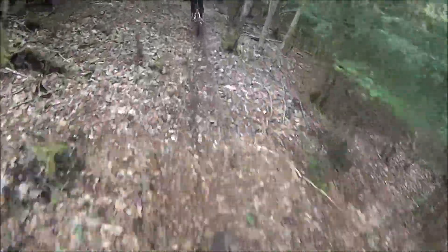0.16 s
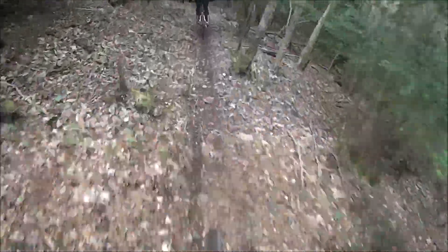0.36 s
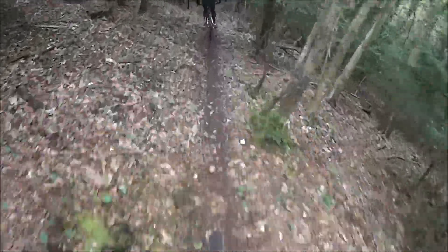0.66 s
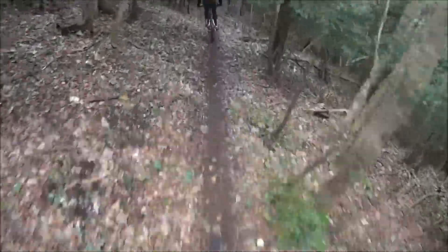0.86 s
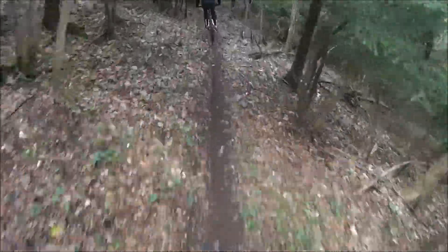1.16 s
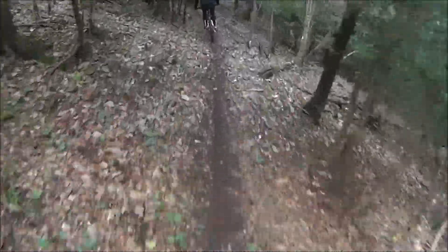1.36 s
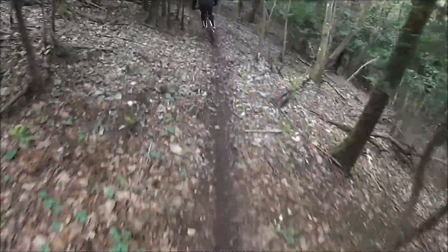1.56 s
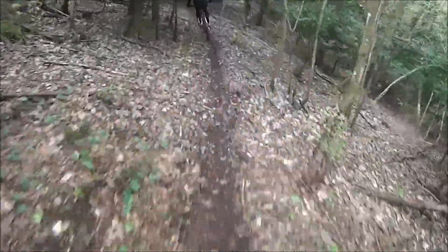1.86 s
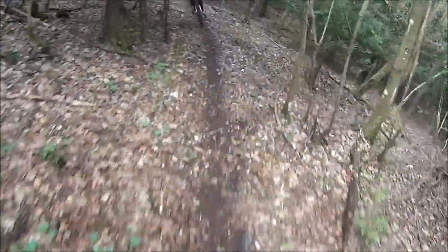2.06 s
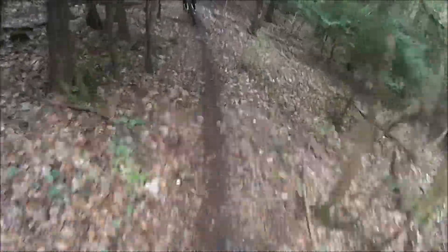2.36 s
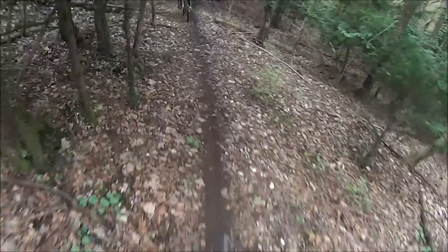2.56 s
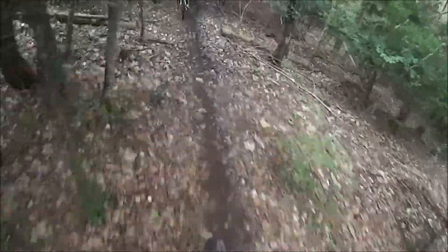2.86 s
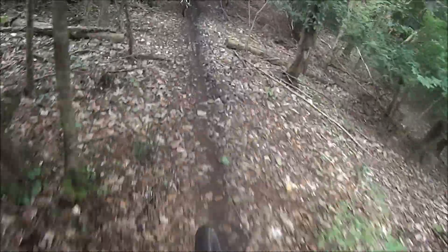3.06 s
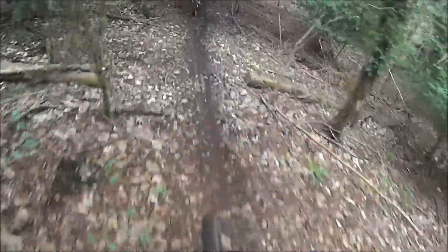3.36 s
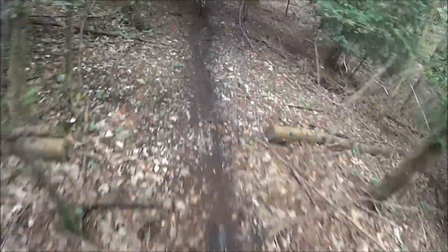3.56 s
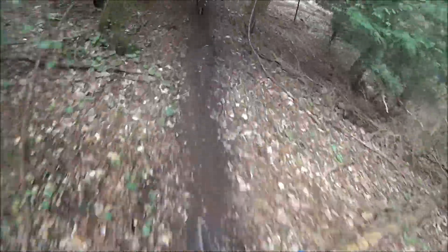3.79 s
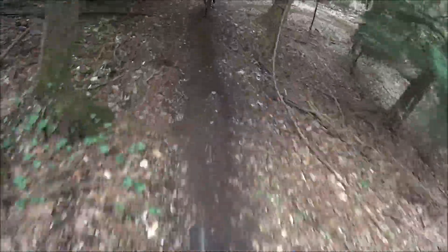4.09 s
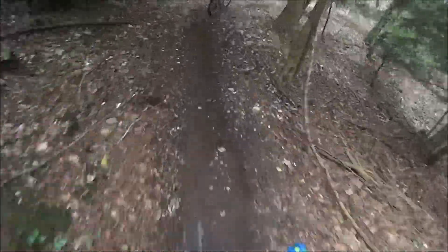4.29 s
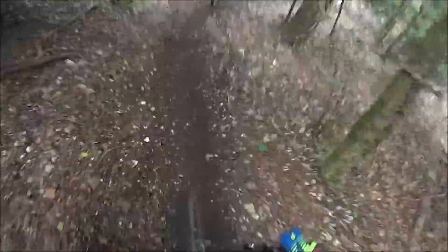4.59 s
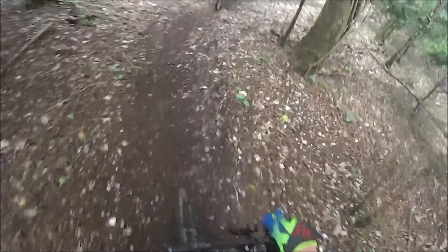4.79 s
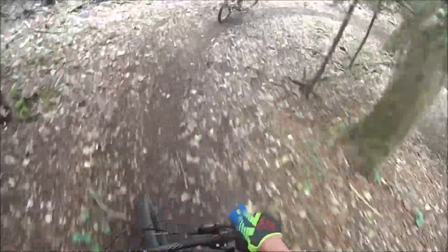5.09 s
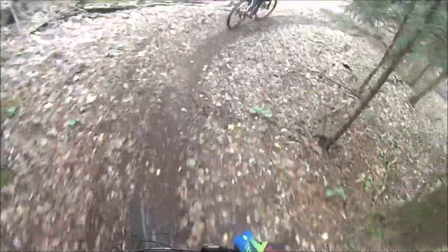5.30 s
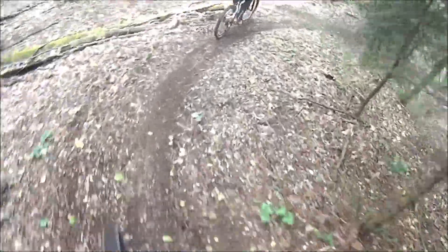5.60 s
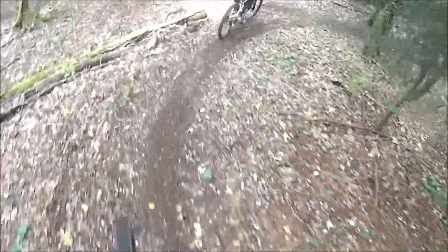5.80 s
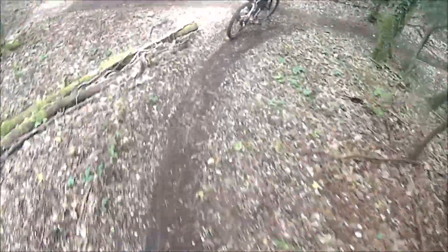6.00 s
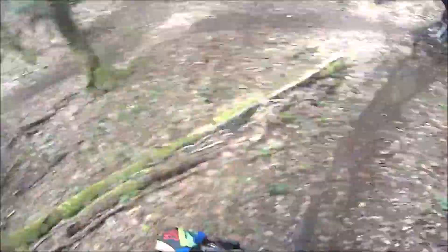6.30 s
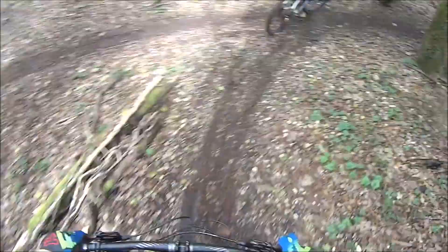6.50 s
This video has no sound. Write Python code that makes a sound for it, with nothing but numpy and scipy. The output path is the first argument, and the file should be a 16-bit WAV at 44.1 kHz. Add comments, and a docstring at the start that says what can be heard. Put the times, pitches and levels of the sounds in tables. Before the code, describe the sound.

Close, rough onboard stereo sound of a bike descending through woodland. Tyres fizz and crunch over dry litter while roots and stones knock the frame with dull thuds and bright clacks toward the left. Brief washboard runs patter evenly, a couple of deep jolts land early on, then a bend scrapes loudly through dirt with heavy blows and buffeting wind. Afterwards it settles to crackling leaves, snapping twigs, rattles and faint fluttering brake hiss.

```python
"""A mountain bike runs fast down a forest trail, heard in stereo from a camera microphone worn by the rider.
It opens in dry leaves: noise-burst crackle and crunch, twig cracks, decaying-mode thuds and swept clacks of a loose part.
Runs of evenly spaced bumps follow; around the fifth second comes a bend, with dirt rasp, heavy jolts and a swell of wind.
Then the rasp falls away and the leaves go on crackling.
Brake hiss and wind rumble, both filtered noise, run underneath throughout."""
import sys
import numpy as np
from scipy import signal
from scipy.fft import rfft, irfft, next_fast_len
from scipy.io import wavfile
from scipy.ndimage import map_coordinates

SR = 44100
rng = np.random.default_rng(int(sys.argv[2]) if len(sys.argv) > 2 else 0)


def to_wav(sig):
    """Store sig (one row per channel, or 1-D mono) as 16-bit WAV at the path in sys.argv[1].

    Samples outside -1..1 are clipped; the rate is SR.
    """
    pcm = np.clip(np.atleast_2d(sig), -1, 1) * 32767
    pcm = np.round(pcm).astype(np.int16)
    wavfile.write(sys.argv[1], SR, pcm.T)  # frames by channels


N = 293176
TIME = np.arange(N) / SR
TOP_HZ = 11100  # upper band limit of the camera


def amp(db):
    """Decibels to gain."""
    return 10 ** (np.asarray(db) / 20)


def unit(x):
    """Scale to rms 1."""
    return x / np.sqrt(np.mean(x ** 2) + 1e-20)


def along(points, hz):
    """(f/Hz, value) points read on a log frequency axis."""
    f, v = np.transpose(points)
    return np.interp(np.log(hz + 1), np.log(f + 1), v)


def curves(rows):
    """One value per sample for each column after the time."""
    s, *cols = np.transpose(rows)
    return [np.interp(TIME, s, c) for c in cols]


def wobble(rate):
    """A smooth random curve, rate knots a second."""
    grid = TIME[::40]
    knots = rng.standard_normal(int(N * rate / SR) + 4)
    return np.interp(TIME, grid, map_coordinates(knots, [grid * rate]))


def impulse(spectrum, size=2048):
    """The causal, minimum-phase ring of a body with this spectrum, energy 1."""
    cepstrum = irfft(np.log(amp(along(spectrum, np.fft.rfftfreq(size, 1 / SR)))))
    # fold the cepstrum forward in time
    cepstrum[1:size // 2] *= 2
    cepstrum[size // 2 + 1:] = 0
    ring = irfft(np.exp(rfft(cepstrum)))
    return ring / np.linalg.norm(ring)


# likeness of left and right at the microphone: (f/Hz, correlation from -1 to 1)
STEREO_LIKENESS = [(40, 1), (180, 0.78), (350, -0.31), (650, -0.59), (1100, -0.25), (2000, 0.73),
                   (6000, 0.89), (11000, 0.71)]


def spread(pair, spectrum):
    """Two unrelated signals become one coloured stereo sound of rms 1."""
    length = pair.shape[1]
    m = next_fast_len(length + 2048)
    likeness = along(STEREO_LIKENESS, np.fft.rfftfreq(m, 1 / SR))
    turn = np.arccos(np.clip(likeness, -1, 1)) / 2
    coloured = rfft(pair, m) * rfft(impulse(spectrum), m)
    mid, side = irfft(coloured * [np.cos(turn), np.sin(turn)], m)[:, :length]
    return unit(np.array([mid + side, mid - side]))


def add(track, s, sound):
    """Mix a short stereo sound in at time s."""
    start = max(round(s * SR), 0)
    track[:, start:start + sound.shape[1]] += sound[:, :max(N - start, 0)]


def filtered(x, response):
    """x times a complex response of frequency."""
    m = next_fast_len(N + SR // 2)
    return irfft(rfft(x, m) * response(np.fft.rfftfreq(m, 1 / SR)), m)[:, :N]


def chance_events(rate, level_db):
    """Random moments, the level at each, and two bell-shaped draws for each."""
    rows = rng.random((max(int(rate * N / SR), 1), 3))
    where = (rows[:, 0] * N).astype(int)
    draws = np.clip(np.log(rows[:, 1:] / (1 - rows[:, 1:])) / 2, -2, 2)
    return TIME[where], level_db[where], *draws.T


def crackle(rate, size_db, life, bed_db):
    """Tiny fractures of very unequal size, each a burst of noise decaying over life s, on a steady noise bed."""
    breaks = (rng.random(N) < rate / SR) * amp(size_db * np.minimum(rng.exponential(size=N), 4))
    power = signal.lfilter([1], [1, -np.exp(-2 / (life * SR))], breaks ** 2)
    return np.sqrt(power / power.mean() + amp(bed_db) ** 2) * rng.standard_normal((2, N))


# air on the microphone, stronger on rough ground: (t/s, level before gain/dB)
WIND_LEVEL = [(0.0, -58), (0.26, -57.5), (0.72, -53.5), (1.74, -45.5), (1.93, -54), (2.48, -52),
              (2.85, -53), (3.16, -62.5), (3.74, -57.5), (4.35, -50), (4.66, -39.5), (4.91, -49.5),
              (5.13, -57), (5.33, -61), (5.54, -63), (6.04, -50), (6.42, -57), (6.65, -55)]
# colour of the buffeting: (f/Hz, relative level/dB per Hz)
BUFFET_SPECTRUM = [(15, -7), (28, 7), (45, -6), (65, -1.5), (90, -11), (150, -14.5), (300, -21),
                   (700, -25.5), (2000, -92)]


def wind(gain_db=2, lump_db=2.5):
    """The airstream buffets the microphone in lumps of low noise, equally strong left and right."""
    buffet_db, = curves(WIND_LEVEL)
    lumps = amp(lump_db * wobble(23)) * spread(rng.standard_normal((2, N)), BUFFET_SPECTRUM)
    return amp(buffet_db + gain_db) * unit(lumps)


# brake pads brushing the discs: (t/s, level before gain/dB)
DISC_LEVEL = [(0.0, -52.5), (0.94, -59.5), (2.16, -52.5), (3.15, -60), (4.15, -57.5), (4.35, -51),
              (4.72, -54), (5.92, -60), (6.48, -56.5), (6.65, -52)]
# colour of the brushing: (f/Hz, relative level/dB per Hz)
DISC_SPECTRUM = [(1500, -39), (4300, -19), (4750, -1.5), (5000, 4), (5250, -1.5), (5650, -12), (9000, -32),
                 (10100, -5), (11000, -21)]


def discs(gain_db=-1.5, flutter_db=2):
    """Lightly brushing pads add a thin, fluttering hiss."""
    level_db, = curves(DISC_LEVEL)
    hiss = spread(rng.standard_normal((2, N)), DISC_SPECTRUM)
    return amp(level_db + gain_db + flutter_db * wobble(35)) * hiss


# heavy landings that heave the rider and the camera: (t/s, heave level midway between the ears/dB, f/Hz)
LANDINGS = [(1.626, -35, 60.4), (1.667, -28.5, 57), (2.241, -34.5, 50.5), (4.461, -28, 54),
            (4.51, -20.5, 48.6), (4.632, -25.5, 41.6), (4.687, -35, 50), (4.736, -25, 48.7),
            (4.801, -33, 46)]
# colour of the rough shudder: (f/Hz, relative level/dB per Hz)
SHUDDER_SPECTRUM = [(40, -12), (80, -1), (120, 0), (180, -8), (300, -24), (550, -14), (900, -35),
                    (2000, -63)]


def jolts(t60=0.14, attack=0.0026, right_db=3.5, shudder_db=-6, shudder_t60=0.1):
    """Each landing sets off a few deep decaying cycles and a rough shudder, louder on the right."""
    out, t = np.zeros((2, N)), np.arange(SR // 3) / SR
    rise = 1 - np.exp(-t / attack)
    for s, db, hz in LANDINGS:
        heave = np.sin(2 * np.pi * hz * t) * amp(-60 * t / t60) * rise
        rough = rng.standard_normal((2, len(t))) * amp(-60 * t / shudder_t60) * rise
        shudder = spread(rough, SHUDDER_SPECTRUM)
        blow = heave / np.abs(heave).max() + amp(shudder_db) * shudder / np.abs(shudder).max()
        add(out, s, blow * amp([[db - right_db], [db + right_db]]))
    return out


# narrow resonances of the frame: (f/Hz, width/Hz, level relative to the direct sound/dB)
FRAME_MODES = [(382.5, 18.5, -3.5), (753, 17, 3.5), (1036.5, 29, -1), (1478, 46, -4), (2040, 31, -3),
               (2531, 66, 1.5), (3160, 27, -28)]


def frame(x):
    """Dirt rasp, thuds and clacks also ring the frame: resonant band-passes are added to the direct sound."""
    def response(f):
        return 1 + sum(amp(db) * 1j * f * w / (c * c - f * f + 1j * f * w) for c, w, db in FRAME_MODES)
    return filtered(x, response)


# roots and stones that jar the bike: (t/s, clack peak level before gain/dB, thud level before gain/dB)
ROOTS_AND_STONES = [(0.0525, -29, -32.5), (0.1337, -37, -31.5), (0.156, -17, -34.5), (0.2176, -29, -30),
                    (0.5173, -23, -29.5), (0.5712, -20.5, -31.5), (0.7244, -21, -34),
                    (0.7815, -32.5, -30.5), (1.0357, -21.5, -34), (1.0717, -34.5, -35),
                    (1.2455, -31.5, -45), (1.3023, -30.5, -29.5), (1.3247, -34, -41),
                    (1.5661, -26.5, -32.5), (1.6038, -27, -30), (1.6456, -27, -30.5), (1.8239, -32.5, -31),
                    (1.8728, -22.5, -30.5), (1.9119, -35, -34), (1.9403, -16.5, -34.5),
                    (2.15, -21.5, -29.5), (2.446, -25, -28), (2.584, -16.5, -33.5), (2.641, -28, -29.5),
                    (2.7337, -22, -31.5), (2.779, -16, -28.5), (2.8256, -31.5, -34), (2.891, -29.5, -33.5),
                    (2.9591, -16.5, -34), (2.9949, -27.5, -32.5), (3.073, -33, -34.5), (3.5216, -24.5, -32),
                    (3.5442, -21.5, -29.5), (3.6146, -37, -34.5), (3.8521, -28.5, -35.5),
                    (3.9099, -21, -31.5), (3.9303, -32, -34.5), (3.9907, -35, -36), (4.1035, -31.5, -30.5),
                    (4.1959, -23, -28.5), (4.2152, -18.5, -29), (4.3131, -37, -31), (4.3925, -28, -29),
                    (4.4356, -25.5, -31), (4.4713, -32, -30), (4.5186, -28, -22), (4.6203, -23.5, -30),
                    (4.6922, -31.5, -27), (4.7485, -25.5, -28), (4.7814, -22.5, -34), (4.8702, -24, -33),
                    (4.9686, -26, -33), (5.002, -21.5, -35), (5.061, -22.5, -28), (5.128, -24, -28.5),
                    (5.143, -24.5, -29), (5.1979, -28, -32.5), (5.2322, -20, -35), (5.2433, -21, -39),
                    (5.2889, -22, -36.5), (5.3602, -29.5, -40.5), (5.542, -30.5, -33.5), (5.558, -31, -37),
                    (5.6825, -16.5, -34), (5.8326, -23, -29), (5.8471, -28, -29.5), (5.9044, -18.5, -27.5),
                    (5.9546, -22, -38), (5.9992, -20.5, -33.5), (6.0926, -23, -37), (6.15, -24, -30.5),
                    (6.2004, -23, -39), (6.2633, -25.5, -30.5), (6.3308, -29.5, -31), (6.3481, -32, -31),
                    (6.4107, -26, -31.5), (6.4318, -31, -34), (6.5322, -27, -30.5)]
# washboard, where the wheel hops evenly:
# (first hop t/s, last hop t/s, hops per s, clack peak level before gain/dB, thud level before gain/dB)
WASHBOARD_RUNS = [(0.826, 0.997, 18, -36, -38), (1.381, 1.497, 26, -35, -36.5),
                  (1.982, 2.118, 21, -39.5, -37.5), (2.211, 2.386, 17, -32, -36)]


def trail(hop_s=0.052, clear_s=0.075, hop_clack_db=14, hop_thud_db=13,
          ripples_per_s=4, ripple_clack_db=7.5, ripple_thud_db=7.5, scatter_db=2):
    """Everything the wheels hit, as (s, clack dB, thud dB); hops and ripples follow the wind table's roughness."""
    rough_db, = curves(WIND_LEVEL)
    hits = [*ROOTS_AND_STONES]
    for first, last, rate, clack_db, thud_db in WASHBOARD_RUNS:
        for s in np.linspace(first, last, round((last - first) * rate) + 1):
            hits.append((s, clack_db, thud_db))
    # with clear_s of open ground ahead, the wheel comes down once more after a flight of hop_s
    times = np.sort([hit[0] for hit in hits])
    landings = times[np.diff(times, append=np.inf) > clear_s] + hop_s
    db = np.interp(landings, TIME, rough_db)
    hops = zip(landings, db + hop_clack_db, db + hop_thud_db)
    # faint bumps at random moments
    s, db, a, b = chance_events(ripples_per_s, rough_db)
    ripples = zip(s, db + ripple_clack_db + scatter_db * a, db + ripple_thud_db + scatter_db * b)
    return [*hits, *hops, *ripples]


# the thud's modes before random detuning and level scatter:
# (f/Hz, relative level/dB, t60/s, right ear's lag/rad)
THUD_MODES = [(56, -20, 0.16, 1), (138, -6, 0.03, -1.35), (195.3, -0.5, 0.082, 1.1855),
              (269, -7.5, 0.032, 2.5), (361.8, -15.5, 0.12, 2.5)]


def thuds(bumps, gain_db=5.5, lead=0.00447, attack=0.0025, detune=0.032, vary_db=2,
          bounce_db=-13, bounce_s=0.01618):
    """Every bump shakes a few low, heavily damped modes that rock from side to side, then bounces once."""
    out, t = np.zeros((2, N)), np.arange(SR // 8) / SR
    for s, _, db in bumps:
        ring = np.zeros((2, len(t)))
        for hz, mode_db, t60, lag in THUD_MODES:
            pitch, strength = rng.standard_normal(2)
            phase = 2 * np.pi * hz * np.exp(detune * pitch) * t
            decay = amp(mode_db + vary_db * strength - 60 * t / t60)
            ring += decay * np.sin([phase, phase - lag])
        thud = amp(db + gain_db) * ring * (1 - np.exp(-t / attack))
        add(out, s - lead, thud)
        add(out, s - lead + bounce_s * (.5 + rng.random()), amp(bounce_db) * thud)
    return out


# colour of the loose part: (f/Hz, relative level/dB per Hz)
CLACK_SPECTRUM = [(300, -22), (700, -21), (900, -12.5), (1130, 3.5), (1340, -5.5), (1550, 2), (2000, -6),
                  (2600, -5), (3200, -21), (5000, -34.5), (11000, -45.5)]


def clacks(bumps, gain_db=-2.0, travel=0.0045, soft=0.58, hard_db=-20, chatter_db=-9, loose=.6,
           chatter_t60=0.056, colour_db=3.5, left_db=6.5, lag=.00008, graze_s=0.00299, graze_db=-15,
           size=4096, count=24):
    """Bending waves carry the treble first, so each clack sweeps down within a few milliseconds."""
    out, t, hz = np.zeros((2, N)), np.arange(size) / SR, np.fft.rfftfreq(size, 1 / SR)
    khz = hz / 1000
    body = rfft(impulse(CLACK_SPECTRUM), size)
    # the part sits to the left: earlier there, and louder in the lower range
    tilt = amp(left_db / (1 + (khz / 2) ** 4) / 2)
    ears = np.array([tilt, np.exp(-2j * np.pi * hz * lag) / tilt])
    for s, db, _ in bumps:
        delay = travel * np.exp(.25 * rng.standard_normal())  # s, at 1 kHz
        bending = np.exp(-4j * np.pi * delay * hz / np.sqrt(khz + 1e-9))
        # gentle contacts sound duller and chatter more; each lands on a new spot, with a new colour
        gentle = max(hard_db - db, 0)
        colour = np.interp(hz, np.linspace(0, TOP_HZ / 2, count), rng.standard_normal(count))
        contact = amp(colour_db * colour - soft * gentle * np.log2(np.maximum(khz, 1)))
        chatter = rng.standard_normal(size) * amp(-60 * t / chatter_t60) * (1 - np.exp(-t / 0.0011))
        blow = 1 + rfft(amp(chatter_db + loose * gentle) * chatter / np.linalg.norm(chatter))
        clack = irfft(blow * contact * bending * body * ears)
        # the envelope's peak falls at time s
        swing = np.abs(signal.hilbert(clack.mean(0)))
        start = s - swing.argmax() / SR
        clack = clack * amp(db + gain_db) / swing.max()
        add(out, start, clack)
        # the part grazes its stop just before it strikes
        add(out, start - graze_s * (.5 + rng.random()), amp(graze_db) * clack)
    return out


# the tyres slip or throw up leaves, loudest in the bend:
# (middle t/s, half length/s, dirt level before gain/dB, leaf level before gain/dB)
SLIPS = [(0.647, 0.015, -60, -40.5), (0.828, 0.017, -55, -43.5), (1.665, 0.077, -48.5, -66),
         (2.122, 0.018, -46, -42.5), (3.446, 0.025, -51, -44), (3.868, 0.022, -47, -42.5),
         (4.61, 0.015, -31, -42), (4.837, 0.016, -28, -55), (4.904, 0.016, -32, -47),
         (5.042, 0.018, -27.5, -57), (5.262, 0.024, -32, -44), (5.336, 0.038, -39.5, -40.5),
         (5.56, 0.034, -46, -45.5), (5.624, 0.025, -35, -54), (5.688, 0.021, -36, -57),
         (6.17, 0.034, -36, -58), (6.619, 0.07, -55, -40.5)]


def scuffs():
    """Power of the dirt and of the leaves thrown by each slip, swelling and fading."""
    s, half, dirt_db, leaf_db = np.transpose(SLIPS)
    grid = TIME[::40]
    swells = np.exp(-np.minimum(((grid - s[:, None]) / half[:, None]) ** 2, 50))
    return [np.interp(TIME, grid, amp(db) ** 2 @ swells) for db in (dirt_db, leaf_db)]


# colour of the bare dirt: (f/Hz, relative level/dB per Hz)
DIRT_SPECTRUM = [(100, -3.5), (200, -6.5), (300, -8.5), (720, -12.5), (1050, -1), (1280, -1), (1500, 0),
                 (1900, -4.5), (2650, 1), (3200, -6), (4000, -14.5), (6000, -20), (11000, -55)]


def dirt(level, slip_db=0.6):
    """Knobs grip and slip on grit in a rasp."""
    rasp = crackle(rate=490, size_db=3.0, life=.0015, bed_db=0) * amp(slip_db * wobble(100))
    return level * spread(rasp, DIRT_SPECTRUM)


# colour of the crushed litter: (f/Hz, relative level/dB per Hz)
CRUNCH_SPECTRUM = [(300, -12), (1000, -16), (1500, -9.5), (2100, -17), (2350, 2.5), (2560, 2), (2850, 0),
                   (3400, -13.5), (5000, -19), (11000, -45)]


def crunch(level, gain_db=-2.5, clump_db=1.85):
    """The litter beneath is crushed with a deeper grain."""
    grain = spread(crackle(rate=220, size_db=5.0, life=0.0024, bed_db=-8), CRUNCH_SPECTRUM)
    return level * amp(gain_db + clump_db * wobble(70)) * grain


def flicks(rate=260, pitch_hz=5200, scatter=0.45, cycles=3, size_db=4.5, size=256):
    """Single leaves and stalks crack as short decaying sines, each at its own pitch and place; rms 1."""
    rows = rng.random((max(int(rate * N / SR), 1), 4))
    bell = np.log(rows[:, 1] / (1 - rows[:, 1])) / 2
    hz = np.clip(pitch_hz * np.exp(scatter * bell), 1200, 11000)
    turns = hz[:, None] * np.arange(size) / SR
    strength = amp(size_db * np.minimum(-np.log(rows[:, 2]), 4))
    grains = strength[:, None] * np.sin(2 * np.pi * turns) * np.exp(-2 * turns / cycles)
    where = ((rows[:, :1] * N).astype(int) + np.arange(size)).ravel()
    pan = rows[:, 3:] - .5
    ears = [np.bincount(where, (grains * side).ravel(), N)[:N] for side in (1 + pan, 1 - pan)]
    return unit(np.array(ears))


# colour of the dry leaves: (f/Hz, relative level/dB per Hz)
LEAF_SPECTRUM = [(300, -13), (700, -11), (1500, -8.5), (2600, 1), (3800, -5), (4500, -1.5), (5050, 3.5),
                 (5800, -3), (7500, -6.5), (8600, -11), (9300, -19.5), (10200, -23)]


def leaves(level, gain_db=0.5, clump_db=1.84, flick_db=-8):
    """Dry leaves crackle in clumps under the tread."""
    fizz = spread(crackle(rate=1300, size_db=3.5, life=0.0017, bed_db=3.5), LEAF_SPECTRUM)
    return level * amp(gain_db + clump_db * wobble(55)) * (fizz + amp(flick_db) * flicks())


# big twigs under the tyres: (t/s, peak level before gain/dB, sharp top over the body before gain/dB)
BIG_TWIGS = [(0.0226, -24.5, 2), (0.1528, -23.5, -13), (0.172, -28, -4), (0.404, -26, -11), (1.335, -28, 8),
             (1.4738, -26.5, 7), (1.606, -28, 1), (2.133, -26, 1), (2.148, -22.5, -4), (2.2099, -24, 3),
             (2.343, -24, 3), (2.4068, -24.5, -10), (2.5012, -21, 10), (3.372, -24, -12),
             (3.4196, -21.5, 1.5), (4.1247, -21, -4), (4.42, -15.5, -21), (4.683, -18.5, 2),
             (4.8644, -21.5, -13), (4.9766, -20.5, -29), (5.3459, -19.5, -20), (5.548, -23, -9),
             (5.689, -26.5, 11), (5.705, -27, 2), (6.0036, -19, -2), (6.1155, -23, 11), (6.2645, -20, -4.5),
             (6.5044, -25.5, -17)]


def litter(leaf_db, twigs_per_s=3, over_leaves_db=16.5, scatter_db=1, sharp_scatter_db=5):
    """The big twigs, and small ones strewn among the leaves, as (s, peak dB, sharpness dB)."""
    s, db, a, b = chance_events(twigs_per_s, leaf_db)
    return [*BIG_TWIGS, *zip(s, db + over_leaves_db + scatter_db * a, sharp_scatter_db * b)]


# colours of a twig's dull body and of its sharp top: (f/Hz, relative level/dB per Hz)
TWIG_BODY_SPECTRUM = [(500, -18), (1400, -18.5), (2100, -5), (2650, 8.5), (3500, -5.5), (5000, -18.5),
                      (11000, -47.5)]
TWIG_TOP_SPECTRUM = [(1000, -40), (3500, 13), (5100, 19.5), (6300, 11.5), (8000, 11.5), (9300, 4),
                     (10400, 3.5)]


def twigs(snaps, gain_db=-0.5, t60=0.011, attack=0.00055, splinter_db=-17, splinter_t60=0.067,
          ragged_db=3.5, crisp_db=1.0, size=64):
    """Each twig goes with a ragged crack and a brief splintering, dull or sharp."""
    out, t = np.zeros((2, N)), np.arange(SR // 12) / SR
    decay = amp(-60 * t / t60) + amp(splinter_db - 60 * t / splinter_t60)
    shape = decay * (1 - np.exp(-t / attack))
    for s, db, sharp_db in snaps:
        fibres = amp(ragged_db * signal.resample(rng.standard_normal(size), len(t)))
        body, top = rng.standard_normal((2, 2, len(t))) * shape * fibres
        sharp = amp(sharp_db + crisp_db) * spread(top, TWIG_TOP_SPECTRUM)
        snap = spread(body, TWIG_BODY_SPECTRUM) + sharp
        add(out, s, snap * amp(db + gain_db) / np.abs(snap.mean(0)).max())
    return out


# tyres on the ground, leaves giving way to bare dirt in the bend; levels before gain:
# (t/s, leaf crackle level/dB, deep crunch level/dB, dirt scrub level/dB)
TYRE_LEVELS = [(0.0, -46, -46, -61), (0.26, -50, -50, -56.5), (1.02, -50, -49.5, -58.5),
               (1.61, -51, -53.5, -55.5), (2.02, -45.5, -48.5, -56.5), (2.35, -47.5, -46, -53.5),
               (2.81, -51, -54, -56.5), (3.07, -54.5, -48, -65), (3.63, -52, -52, -56.5),
               (4.15, -51, -50, -48.5), (4.56, -46.5, -56.5, -42.5), (4.91, -45.5, -33.5, -43),
               (5.18, -47, -49.5, -43), (5.35, -48.5, -48.5, -56.5), (5.89, -50, -52, -57.5),
               (6.05, -46.5, -42.5, -51.5), (6.46, -52.5, -57, -55), (6.65, -47, -44, -52)]


def scene(scrub_db=3.0, scuff_db=-1, rustle_db=-2, grip_db=1.5, cover_db=0.6, patches_per_s=22):
    """Airstream, rattling bike and tyres together; grip and leaf cover vary from patch to patch of ground."""
    leaf_db, crunch_db, dirt_db = curves(TYRE_LEVELS)
    dirt_power, leaf_power = scuffs()
    grip, cover = grip_db * wobble(patches_per_s), cover_db * wobble(patches_per_s)
    # steady rolling and slips add as powers
    dirt_level = np.sqrt(amp(dirt_db + scrub_db + grip) ** 2 + amp(scuff_db) ** 2 * dirt_power)
    leaf_level = np.sqrt(amp(leaf_db + cover) ** 2 + amp(rustle_db) ** 2 * leaf_power)
    bumps = trail()
    bike = frame(dirt(dirt_level) + thuds(bumps) + clacks(bumps)) + jolts() + discs()
    ground = leaves(leaf_level) + crunch(amp(crunch_db + cover)) + twigs(litter(leaf_db))
    return wind() + bike + ground


def record(dry):
    """The camera keeps nothing above its band limit."""
    return filtered(dry, lambda hz: hz < TOP_HZ)


dry = scene()
out = record(dry)
to_wav(out)
```